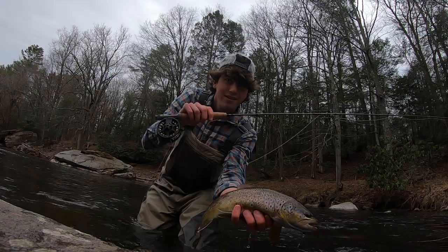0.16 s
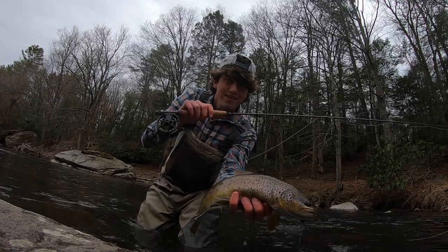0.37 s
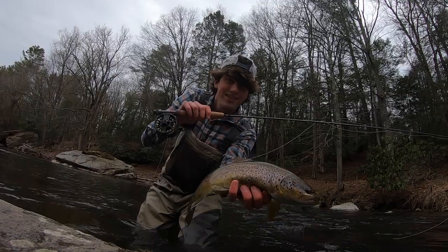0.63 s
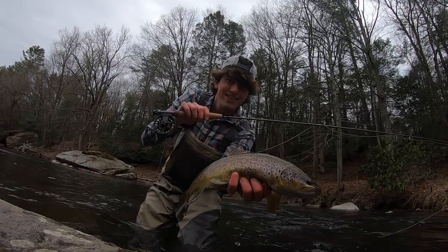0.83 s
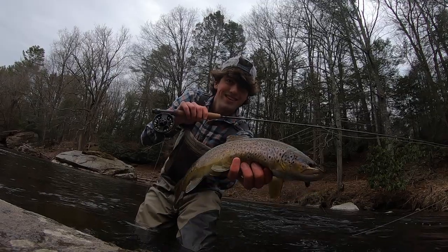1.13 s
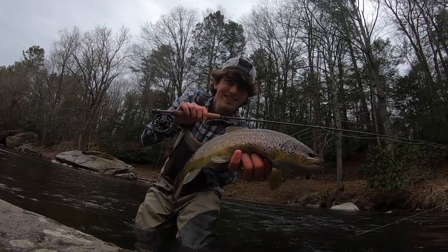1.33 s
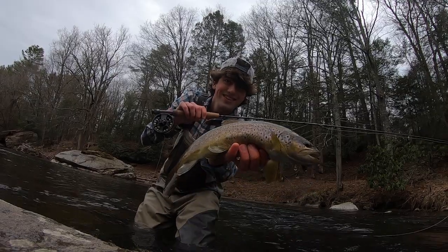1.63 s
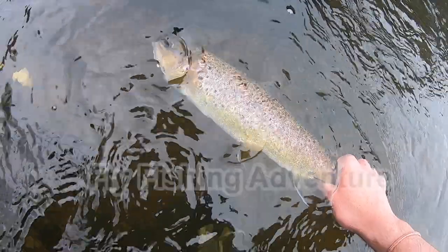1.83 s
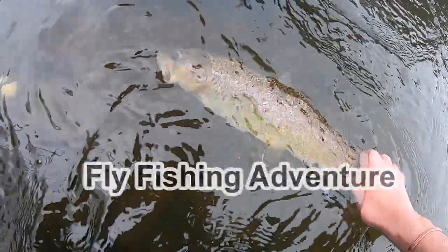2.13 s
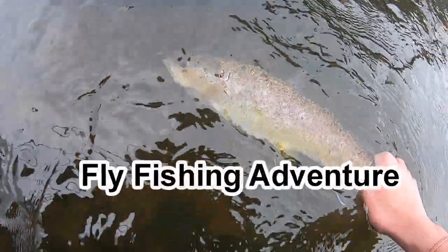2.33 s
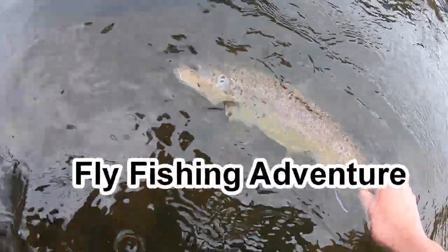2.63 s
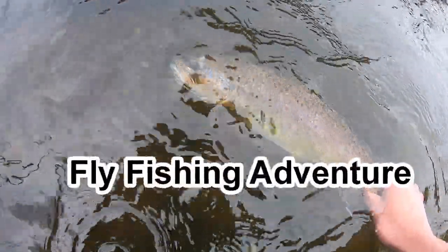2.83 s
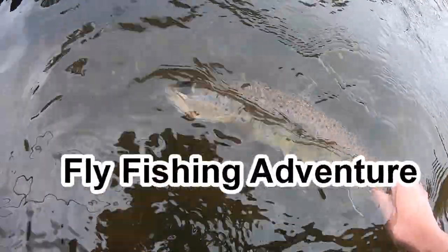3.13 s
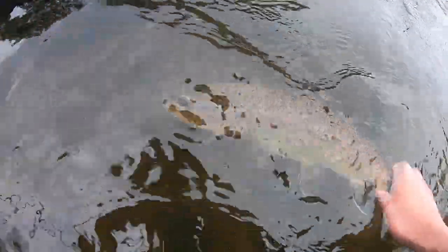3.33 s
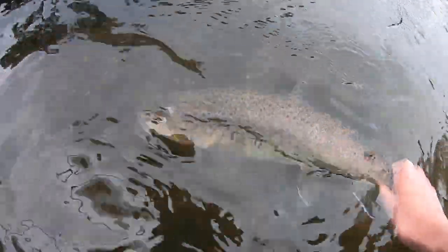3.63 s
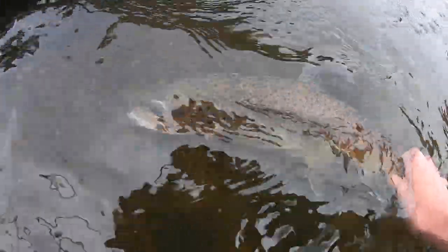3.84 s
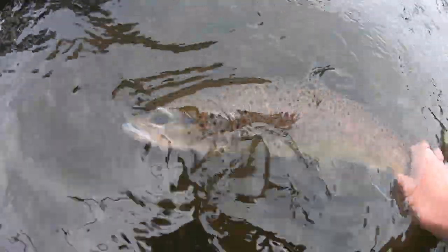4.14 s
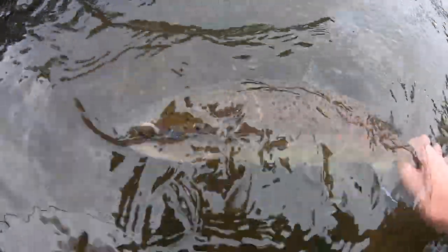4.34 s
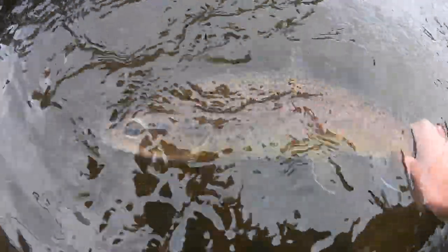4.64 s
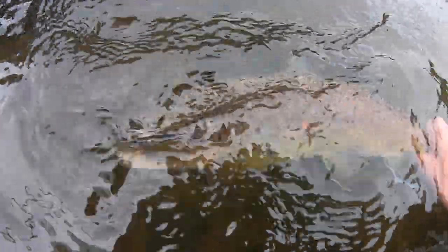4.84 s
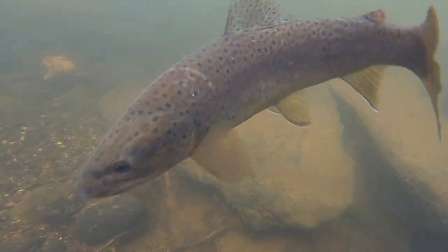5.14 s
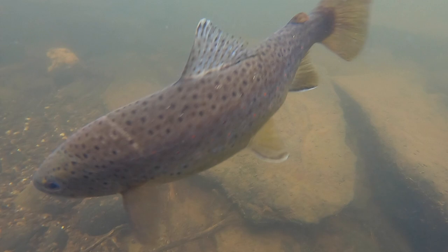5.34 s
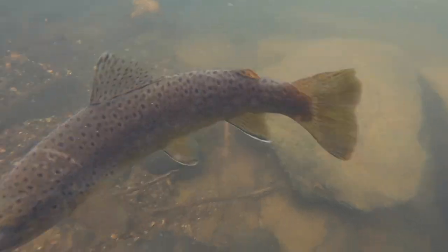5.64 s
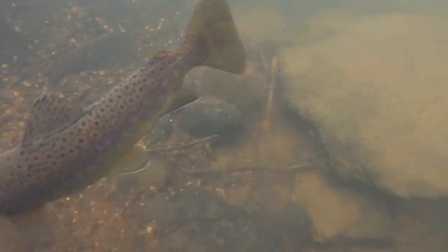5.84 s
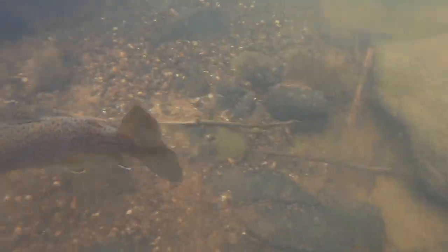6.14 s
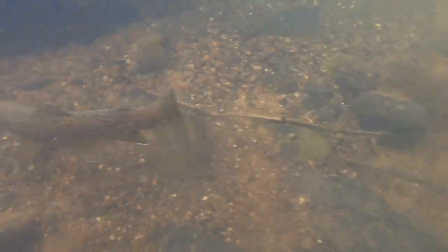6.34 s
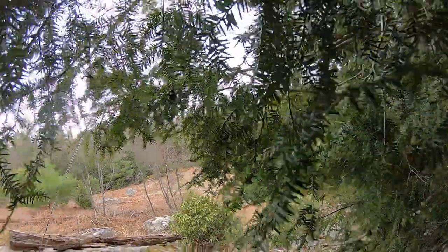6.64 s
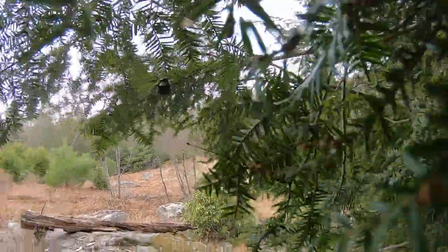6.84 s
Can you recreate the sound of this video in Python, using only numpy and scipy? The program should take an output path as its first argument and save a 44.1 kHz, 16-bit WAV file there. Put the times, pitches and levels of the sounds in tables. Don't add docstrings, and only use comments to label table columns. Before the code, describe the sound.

A stream rushes dully, then close and bright with drips and glugs, plunges into muffled underwater booms and knocks, and ends in quiet leaf rustle.

```python
import sys
import numpy as np
from scipy import signal
from scipy.fft import rfft, irfft, next_fast_len
from scipy.io import wavfile
from scipy.ndimage import uniform_filter1d

SR = 44100
rng = np.random.default_rng(int(sys.argv[2]) if len(sys.argv) > 2 else 0)


def master(y):
    cut = np.clip(np.atleast_2d(y).T, -1, 1)
    pcm = np.round(cut * 32767)
    wavfile.write(sys.argv[1], SR, pcm.astype(np.int16))


def boost_factor(decibels):
    exponent = np.asarray(decibels, float) / 20
    return 10 ** exponent


N = 307818
TIME = np.arange(N) / SR
LEFT_RIGHT = np.array([[.5], [-.5]])


def in_time(rows):
    s, *columns = np.transpose(rows)
    return [np.interp(TIME, s, c) for c in columns]


def at_hz(points, hz):
    return np.interp(np.log(hz + 1), np.log(np.array(points)[:, 0]), np.array(points)[:, 1])


def rms_one(x):
    return x / np.sqrt(np.mean(x ** 2) + 1e-20)


def drift(rate, size):
    r = np.exp(-80 * np.pi * rate / SR)
    slow = signal.lfilter([1], [1, -2 * r, r * r], rng.standard_normal(size // 40 + 1002))[1000:]
    return np.interp(np.arange(size) / 40, np.arange(len(slow)), rms_one(slow))


def band(x, lo_hz, hi_hz, order=2):
    return signal.sosfilt(signal.butter(order, [lo_hz, hi_hz], "band", fs=SR, output="sos"), x)


def even(x, s):
    size = int(s * SR)
    power = uniform_filter1d(uniform_filter1d(x ** 2, size), size)
    return x / np.sqrt(power + 0.054 * np.mean(x ** 2))


def ring(clicks, hz, t60):
    r, w = boost_factor(-60 / (t60 * SR)), 2 * np.pi * hz / SR
    return signal.lfilter([0, np.sin(w)], [1, -2 * r * np.cos(w), r * r], clicks + 1e-18)


def taps(rows, rise_ms):
    out = np.zeros(N + SR)
    ms = np.arange(int(SR * .15)) * 1000 / SR
    rise = np.sin(np.pi / 2 * np.clip(ms / rise_ms, 0, 1)) ** 2
    for (s, db, hz, fall_ms), phase in zip(rows, rng.random(len(rows))):
        shape = rise * np.exp(-np.clip(ms - rise_ms, 0, None) / fall_ms)
        at = round(s * SR)
        out[at:at + len(ms)] += boost_factor(db) * shape * np.sin(2 * np.pi * (hz * ms / 1000 + phase))
    return out[:N]


def swells(start, length, db, rise_db_per_s, fall_db_per_s, rest_db):
    start, length, db, fall = [np.reshape(v, (-1, 1)) for v in (start, length, db, fall_db_per_s)]
    t = TIME[::32]
    rise_db = rise_db_per_s * np.clip(start - t, 0, None)
    each = db - rise_db - fall * np.clip(t - start - length, 0, None)
    return np.interp(TIME, t, np.maximum(each.max(axis=0), rest_db))


SCENES = [
    .036,
    1.8,
    4.94,
    6.5075,
]


def part(k):
    return slice(*[round(s * SR) for s in (SCENES + [N / SR])[k:k + 2]])


# f/Hz, share
FINE_SHARE = [(8300, 0.35), (9300, 0.94)]


def rush(k, spectrum, alike, patchy_db, lean=((100, 0), (200, 0)), top_db=0 * TIME, top=FINE_SHARE):
    size = part(k).stop - part(k).start
    fast = next_fast_len(size)
    hz = np.arange(fast // 2 + 1) * SR / fast
    share = np.clip(at_hz(alike, hz), -.6, 1)
    mid, side = rfft(rng.standard_normal((2, fast))) * boost_factor(at_hz(spectrum, hz))
    pair = np.sqrt(1 + share) * mid + np.sqrt(1 - share) * side * [[1], [-1]]
    pair = pair * boost_factor(at_hz(lean, hz) * LEFT_RIGHT)
    steps = 2 * np.log2(np.maximum(hz, 30) / 30)
    sound, together, splashes = np.zeros((2, size)), drift(2.2, size), drift(46, size)
    for step in range(19):
        gain_db = patchy_db * (0.17 * together + drift(2.3, size) + 0.069 * step * splashes)
        sound += boost_factor(gain_db) * irfft(pair * np.clip(1 - abs(steps - step), 0, 1), fast)[:, :size]
    treble = irfft(rfft(sound, fast) * at_hz(top, hz), fast)[:, :size]
    sound += (boost_factor(top_db[part(k)]) - 1) * treble
    out = np.zeros((2, N))
    out[:, part(k)] = sound
    plain = np.mean(irfft(pair, fast).mean(axis=0) ** 2)
    return out / np.sqrt(1.464 * plain)


def add_bubble(out, s, db, hz, pan_db, cycles, rise, soft=0.25):
    turns = np.arange(int(5 * cycles / hz * SR)) * hz / SR
    tone = np.sin(2 * np.pi * turns * (1 + rise * turns / cycles))
    tone *= np.exp(-turns / cycles) * (1 - np.exp(-turns / soft)) ** 2
    at = round(s * SR)
    out[:, at:at + len(tone)] += (boost_factor(db + LEFT_RIGHT * pan_db) * tone)[:, :N - at]


def bubbles(k, spectrum, count, db, low_hz, span, cycles, wide_db):
    out, start, end = np.zeros((2, N)), SCENES[k], (SCENES + [N / SR])[k + 1] - .02
    for when, pitch, loud, side, long in rng.random((count, 5)):
        hz = low_hz * span ** pitch
        level_db = db + at_hz(spectrum, hz) + 10 * np.log10(hz) - 3.0 * np.log(max(loud, .09))
        s, pan_db = start + when * (end - start), wide_db * (2 * side - 1)
        add_bubble(out, s, level_db, hz, pan_db, cycles * (0.7 + long), .05)
    return out


# f/Hz, level/dB per Hz
FAR_COLOUR = [(12, -28), (20, -5), (48, -16), (113, -4.5), (153, -5), (364, -3), (660, -6), (1260, -16.5),
              (2170, -26), (2340, -31), (3650, -29.5), (4460, -41), (4920, -47.5), (6630, -56.5),
              (7500, -58), (9750, -86), (16500, -120)]
# f/Hz, share
FAR_ALIKE = [(60, 0.86), (180, 1), (550, -0.028), (1650, 0.11), (3200, -0.15), (4970, -0.18), (7000, -0.76)]
# f/Hz, level/dB
FAR_LEAN = [(100, -2.5), (400, -0.1), (700, 0), (1300, -5), (2400, -7), (4400, -3), (8000, 4)]
# t/s, level/dB
FAR_FLOW = [(.04, -41.5), (.3, -40), (.6, -40), (.95, -38), (1.35, -38.5), (1.8, -40.5)]
# t/s, length/s, level/dB
WAVES = [
    (.6, .02, 1.5),
    (.92, 0.33, 1.3),
    (1.7, .1, 1),
]
# f/Hz, share
SPARKLE_SHARE = [(2000, 0), (2500, 1.5), (4100, 2), (4450, 8), (4720, -0.5), (4800, 0.5), (8000, 3.5)]


def far_riffle():
    flow_db, = in_time(FAR_FLOW)
    sparkle_db = swells(*np.transpose(WAVES), 38, 38, -0.5)
    far = rush(0, FAR_COLOUR, FAR_ALIKE, patchy_db=1.58, lean=FAR_LEAN, top_db=sparkle_db, top=SPARKLE_SHARE)
    far += bubbles(0, FAR_COLOUR, count=300, db=-28.5, low_hz=205.6, span=12.46, cycles=3.94, wide_db=8.0)
    far += bubbles(0, FAR_COLOUR, count=120, db=-25.5, low_hz=2076, span=3.1, cycles=7.9, wide_db=15.5)
    return far * boost_factor(flow_db - 0.5) * np.clip((TIME - SCENES[0]) / 0.0093, 0, 1)


# t/s, peak level/dB, f/Hz, pan/dB
FAR_DRIPS = [(.1166, -43, 1050, 8.5), (.2673, -53, 3150, -8), (0.3516, -47, 1420, -20),
             (0.368, -53, 2680, -13), (.548, -52, 2380, -16), (.565, -48, 1600, -4),
             (.7028, -47.5, 2620, -6), (.735, -67, 6060, -5), (.858, -49.5, 2510, -16),
             (.905, -47, 2180, -4), (0.9688, -53, 3370, -16), (1.4669, -48, 2239, 0),
             (1.4674, -44, 1670, 3), (1.6603, -51, 2800, -12)]
# t/s, peak level/dB, f/Hz, pan/dB
NEAR_DRIPS = [(1.8426, -56, 6100, 0), (1.9021, -59, 6800, 6), (2.141, -52, 4800, 4), (2.2495, -54, 7640, 6),
              (2.5229, -61, 8957, -1), (2.6385, -45, 2080, -6), (2.64, -42, 1030, -4),
              (2.737, -44.5, 2110, 24), (2.7376, -53, 7400, -3), (2.7533, -53.5, 7300, -3),
              (2.7539, -59, 9991, 6), (2.838, -49, 6160, -3), (2.889, -45.5, 3080, 12),
              (2.9681, -55, 8050, 15), (2.9857, -51, 6230, -2), (2.995, -44, 3140, 10),
              (3.0023, -59, 10200, -1), (3.0766, -50, 6373, -8), (3.182, -47.5, 7000, 0),
              (3.2511, -54, 8200, 4), (3.387, -41, 1750, 2), (3.5274, -54, 7235, 0),
              (3.6763, -58, 5512, -5), (4.189, -45, 3340, 1), (4.209, -49, 6201, -6),
              (4.22, -38.5, 2300, 4), (4.3963, -52, 7600, 4), (4.577, -48.5, 6340, -6),
              (4.843, -43.5, 6850, 0), (4.849, -50, 4570, 0)]


def drips():
    out = np.zeros((2, N))
    for s, db, hz, pan_db in FAR_DRIPS + NEAR_DRIPS:
        add_bubble(out, s, db + 6.0, hz, pan_db, 4.2 * (hz / 1000) ** 0.31, .012)
    return out


# t/s, peak level/dB, low
# f/Hz, high f/Hz, pan/dB
SNAPS = [(0.37, -38.5, 2490, 3860, -14), (.737, -56, 4800, 6700, 12), (.94, -54, 3400, 5200, -6),
         (1.266, -54, 4100, 4900, -7), (2.6405, -29.5, 900, 3440, -5), (5.155, -69, 1500, 8070, -2.5),
         (5.166, -66, 1500, 8000, -2.5), (5.176, -65, 1500, 8000, -3), (5.345, -56, 1800, 4850, -2),
         (5.366, -66.5, 1800, 5000, 0.5), (5.412, -60, 1800, 5000, -1), (5.377, -69.5, 1800, 5000, -5),
         (5.74, -66, 1800, 6000, 4), (5.771, -65, 1900, 8000, 2.5), (6.285, -65.5, 2100, 6980, 0),
         (6.312, -65, 1700, 4000, 0)]


def sharp_snaps():
    out = np.zeros((2, N))
    for s, db, low_hz, high_hz, pan_db in SNAPS:
        pop = band(signal.unit_impulse(400), low_hz, high_hz, order=4)
        at = round(s * SR)
        out[:, at:at + 400] += boost_factor(db + LEFT_RIGHT * pan_db) * pop / pop.max()
    return out


# t/s, peak level/dB, f/Hz, pan/dB, cycles rung
GLUGS = [
    (0.452, -38, 3560, -17, 9.4),
    (1.884, -35, 1383, -1, 24),
    (2.06, -25.5, 461, -0.5, 9.2),
    (4.854, -27, 1070, 9.4, 4.4),
]


def glugs():
    out = np.zeros((2, N))
    for s, db, hz, pan_db, cycles in GLUGS:
        add_bubble(out, s, db, hz, pan_db, cycles, 12.0 / hz, soft=0.28 * cycles)
    return out


# f/Hz, level/dB per Hz
NEAR_COLOUR = [(12, -54), (20, -2), (54, -6), (101, -13.5), (122, -19), (148, -6), (174, -1.5), (249, -3),
               (468, -3.5), (687, -6.5), (1290, -7), (3020, -20), (5100, -30.5), (5500, -29.5),
               (7250, -26.5), (11000, -49), (13900, -61.5), (14400, -90)]
# f/Hz, share
NEAR_ALIKE = [(60, 0.56), (170, 1), (380, 0.97), (900, 0.65), (2400, 0.38), (5000, 0.67), (7500, -0.37),
              (15000, 0.38)]
# f/Hz, level/dB
NEAR_LEAN = [(100, -2), (400, -1.5), (800, -2.5), (1300, 0.2), (2400, 0.7), (5000, .1)]
# t/s, level/dB
NEAR_FLOW = [(1.8, -41.5), (2.3, -42.5), (2.65, -41.5), (3.0, -41), (3.8, -41.5), (4.2, -40), (4.94, -40.5)]
# t/s, length/s, level/dB
SPRAY = [
    (2.4, 2.6, -1.5),
]
# f/Hz, share
SPRAY_SHARE = [(5150, 0.1), (5350, 1), (9000, 0.91), (11500, 0.087)]


def near_water():
    flow_db, = in_time(NEAR_FLOW)
    spray_db = swells(*np.transpose(SPRAY), 17, 0, -10)
    near = rush(1, NEAR_COLOUR, NEAR_ALIKE, patchy_db=1.12, lean=NEAR_LEAN, top_db=spray_db, top=SPRAY_SHARE)
    near += bubbles(1, NEAR_COLOUR, count=700, db=-30, low_hz=403.2, span=9, cycles=7, wide_db=-7.5)
    pops = bubbles(1, NEAR_COLOUR, count=500, db=-23.0, low_hz=2288, span=8.73, cycles=5.5, wide_db=11.5)
    near += boost_factor(spray_db) * pops
    return near * boost_factor(flow_db) * np.clip((SCENES[2] + 0.01 - TIME) / 0.0058, 0, 1)


# t/s, f/Hz
REACH = [(2.9, 14100), (3.4, 13000), (3.9, 13400), (4.9, 14400)]


def ceiling(x):
    edge_hz = (in_time(REACH)[0] + 450 * drift(10, N))[part(1)]
    out, size = x.copy(), len(edge_hz)
    fast = next_fast_len(size)
    tones, hz = rfft(x[:, part(1)], fast), np.arange(fast // 2 + 1) * SR / fast
    for low_hz in np.arange(12400, 16400, 400):
        shut = np.clip((low_hz - edge_hz) / 100 + 2, 0, 1)
        out[:, part(1)] -= shut * irfft(tones * (abs(hz - low_hz - 200) < 200), fast)[:, :size]
    return out


# t/s, peak level/dB, f/Hz
BUMPS = [
    (2.127, -32.5, 60.6),
    (2.15, -21, 64.5),
    (2.241, -38.5, 65.6),
    (2.545, -37, 96),
    (2.567, -32, 65.8),
    (2.602, -35.5, 64),
    (2.818, -39.5, 67),
    (4.08, -39.5, 48.7),
]


def hand_bumps():
    out = np.zeros((2, N))
    for s, db, hz in BUMPS:
        add_bubble(out, s, db + 5.5, hz, 0, .9, .03)
        add_bubble(out, s - .004, db - 4.5, 2.7 * hz, 0, 1.3, -.04)
    return out


# t/s, length/s, level/dB, buffeting f/Hz
SURGES = [(4.934, 0.038, -15, 17), (5.041, 0.07, -18, 24), (5.184, 0.016, -14, 24), (5.31, 0.058, -13, 16),
          (5.408, 0.0063, -19, 22), (5.611, 0.0083, -22.5, 20), (5.751, 0.035, -15.5, 19),
          (5.917, 0.098, -15.5, 31), (6.091, 0.11, -20.5, 29), (6.319, 0.033, -14, 21),
          (6.475, .02, -15.5, 19)]


def buffeting():
    s, length, db, hz = np.transpose(SURGES)
    turns = np.cumsum(np.interp(TIME, s + length / 2, hz)) / SR
    level_db = swells(s, length, db, 169, 169, -42)
    eddies = even(band(rng.standard_normal(N), 8, 38, order=4), .06)
    return boost_factor(level_db) * (0.87 * np.sin(2 * np.pi * turns) + 0.52 * eddies)


# t/s, level/dB
GURGLE = [(4.93, -47.5), (5.2, -49), (5.38, -48), (5.52, -52), (5.6, -45.5), (5.76, -49.5), (6.05, -51.5),
          (6.18, -43), (6.5, -48)]


def gurgling():
    level_db, = in_time(GURGLE)
    noise = rms_one(band(rng.standard_normal(N), 90, 330, order=4))
    return boost_factor(level_db - 0.5 + 3.7 * drift(35, N)) * noise


# f/Hz, level/dB, t60/s
HOUSING = [(340, -2, .03), (440, -1, .045), (580, -2, .04), (710, -2, .05), (960, -6, .04),
           (1250, -5, .025), (1550, -1, .035), (1750, -5, .025)]
# t/s, length/s, level/dB, rasp against scrape/dB
DRAGS = [
    (5.007, 0.043, -50.5, -24.5),
    (5.161, 0.023, -63, -9.5),
    (5.371, 0.058, -47, -15.5),
    (5.482, 0.026, -59.5, -13.5),
    (5.572, 0.067, -48.5, -12),
    (5.666, .015, -49, -24.5),
    (5.752, 0.07, -61.5, -10),
    (6.153, .06, -66.5, -17.5),
    (6.277, 0.051, -59.5, -15),
    (6.356, 0.067, -59, -15),
]


def scraping():
    s, length, db, bright_db = np.transpose(DRAGS)
    scrape_db = swells(s, length, db, 447, 447, -65)
    rasp_db = swells(s, length, db + bright_db, 447, 447, -82.5)
    grit = (rng.random(N) < 900 / SR) * np.sign(rng.standard_normal(N))
    grit = grit * boost_factor(3 * np.minimum(rng.exponential(1, N), 3))
    low, high = [rms_one(sum(ring(grit, hz, t60 * .6) * (-.68) ** k for k, (hz, db, t60) in enumerate(modes)))
                 for modes in (HOUSING[:5], HOUSING[5:])]
    scrape = boost_factor(scrape_db) * band(low, 330, 1700, order=3) + boost_factor(rasp_db) * band(high, 1350, 2500)
    edge = boost_factor(rasp_db - 19.0) * rms_one(band(grit, 1850, 2100, order=3))
    return scrape, edge


# t/s, level/dB, f/Hz, dying time/ms
TAP_RINGS = [(5.012, -57, 973, 26), (5.024, -27.5, 413, 4.4), (5.03, -37, 696, 6.5), (5.045, -60, 900, 7.1),
             (5.205, -60, 697, 2.6), (5.384, -27, 424, 5.3), (5.387, -50, 804, 2.7), (5.401, -45, 883, 15),
             (5.419, -32, 420, 6.5), (5.425, -33, 838, 3), (5.468, -61, 872, 6), (5.488, -70, 904, 5),
             (5.571, -58, 764, 5), (5.571, -42, 353, 9.2), (5.598, -41, 557, 4), (5.617, -47, 592, 5.4),
             (5.63, -53, 876, 6), (5.635, -44.5, 370, 6), (5.644, -55.5, 885, 6), (5.652, -46, 630, 10),
             (5.678, -50.5, 903, 12), (5.679, -38, 423, 9.7), (5.78, -43.5, 448, 10), (5.845, -49, 450, 3.3),
             (5.842, -55.5, 930, 2.8), (6.029, -55, 792, 3), (6.16, -34, 412, 2), (6.161, -50.5, 754, 3),
             (6.197, -38, 395, 2.8), (6.199, -52, 810, 3.3), (6.274, -36.5, 707, 3.7), (6.275, -44, 458, 7.4),
             (6.31, -58, 794, 4.6), (6.356, -49, 646, 2.5), (6.376, -52.5, 795, 3), (6.379, -35.5, 430, 4.9),
             (6.388, -44, 895, 4.2), (6.39, -29.5, 610, 5.8), (6.412, -35.5, 394, 4.4),
             (6.431, -37, 420, 4.7), (6.431, -53, 756, 3.2),
             (5.026, -37.5, 1060, 1.9), (5.026, -60, 1590, 2), (5.165, -66, 1450, 3.3),
          (5.343, -64, 1340, 3.2), (5.364, -54.5, 1100, 4.9), (5.386, -43.5, 1205, 3.2),
          (5.386, -45, 1550, 2.6), (5.403, -66, 1668, 3.3), (5.425, -49, 1630, 3), (5.471, -74, 1660, 9.9),
          (5.573, -62.5, 1420, 7), (5.586, -63.5, 1680, 4), (5.606, -60, 1480, 4), (5.622, -59, 1640, 4),
          (5.644, -65, 1500, 4), (5.654, -67, 1668, 4.5), (5.683, -61, 1410, 3.3), (5.717, -70.5, 1356, 5),
          (5.806, -62, 1710, 2.7), (5.805, -62, 1356, 3), (5.843, -58.5, 1442, 1.4),
          (5.921, -76, 1460, 6.3), (6.028, -63.5, 1470, 1.9), (6.052, -74, 1480, 6),
          (6.162, -55.5, 1406, 3.4), (6.198, -59.5, 1475, 3), (6.203, -69, 1700, 6),
          (6.215, -68.5, 1604, 3.1), (6.236, -71, 1550, 5.3), (6.274, -52, 1470, 1.6), (6.31, -70, 1664, 2),
          (6.343, -66, 1658, 4), (6.355, -53, 1205, 2.7), (6.356, -60.5, 1540, 1.8), (6.376, -52, 1184, 3),
          (6.376, -55.5, 1518, 3.2), (6.389, -46, 1528, 1.8), (6.412, -52, 1399, 4), (6.42, -61, 1260, 3.4),
          (6.429, -50.5, 1105, 5.2), (6.43, -56, 1530, 4.9)]


def stone_taps():
    return boost_factor(5.5) * taps(TAP_RINGS, rise_ms=2.5)


# t/s, level/dB
THUDS = [
    (5.031, -22.5),
    (5.3903, -31.5),
    (5.432, -3),
    (5.69, -28),
    (5.812, -22),
]


def thuds():
    s, db = np.transpose(THUDS)
    blows = np.zeros(N)
    blows[(s * SR).astype(int)] = boost_factor(db)
    boom = ring(blows - 0.73 * np.roll(blows, 235), 94, 0.061)
    return boom + 0.37 * ring(np.roll(blows, -270), 245, 0.017)


# t/s, level/dB
FLEXES = [(5.032, -19.5), (5.175, -26), (5.238, -22), (5.354, -23.5), (5.465, -23), (5.58, -27.5),
          (5.701, -23), (5.76, -30), (5.824, -20), (5.999, -33), (6.152, -28), (6.27, -37.5), (6.33, -22.5),
          (6.416, -19)]


def flex_boom():
    s, db = np.transpose(FLEXES)
    level_db = swells(s, 0, db, 299, 254.5, -37)
    return boost_factor(level_db + 0.5) * even(band(rng.standard_normal(N), 55.2, 112.2, order=4), 0.0097)


# t/s, peak level/dB, middle of the modes struck f/Hz, dullness/dB per octave off it
KNOCKS = [
    (5.424, -2.5, 327, 29.5),
    (5.806, -3, 333, 21.5),
]


def knocks():
    s, peak_db, middle_hz, dull_db = np.transpose(KNOCKS)
    at, scatter_db = (s * SR).astype(int), rng.normal(0, 4.0, (len(s), len(HOUSING)))
    out = np.zeros(N)
    for k, (hz, db, t60) in enumerate(HOUSING):
        off_db = dull_db * abs(np.log2(hz / middle_hz))
        blows = np.zeros(N)
        blows[at] = boost_factor(peak_db + db - 2.0 + scatter_db[:, k] - off_db) * (-1) ** k
        contact = signal.windows.hann(int(1.3 * SR / hz))
        out += ring(np.convolve(blows, 2.15 * contact / contact.sum())[:N], hz, 0.71 * t60)
    return out


def underwater():
    scrape, edge = scraping()
    body = buffeting() + flex_boom() + gurgling() + scrape + knocks() + stone_taps() + thuds()
    leak = boost_factor(-14.0) * band(body, 1800, 3400, order=3) + edge
    body = signal.sosfilt(signal.cheby1(8, 1, 1800, fs=SR, output="sos"), body) + leak
    body += boost_factor(-96.5) * rms_one(band(rng.standard_normal(N), 1100, 2800))
    fizz = rms_one(band(rng.standard_normal(N), 1900, 4900, order=1))
    body += boost_factor(-48) * uniform_filter1d(abs(body) ** 3, 400) * fizz
    end = part(2).stop
    last = np.clip(1 - (end / SR - TIME) / 0.013, 0, 1) ** 2
    body += (0.076 - body[end - 1]) * last
    body *= np.clip((TIME - 4.93) / 0.012, 0, 1) * (np.arange(N) < end)
    return signal.sosfilt(signal.cheby2(10, 60, 11500, fs=SR, output="sos"), body)


# t/s, level/dB
BREEZE = [(6.515, -63.5), (6.65, -56), (6.82, -59), (6.98, -62.5)]
# f/Hz, level/dB per Hz
AIR_COLOUR = [(18, -46), (30, -0.5), (103, 2.5), (223, 4), (395, -4.5), (569, -2), (919, -2.5), (984, -4),
              (1350, -8), (4140, -13.5), (7000, -30), (9100, -35), (14000, -39), (15400, -63)]


def breeze():
    level_db, = in_time(BREEZE)
    return boost_factor(level_db) * rush(3, AIR_COLOUR, [(50, .99), (5000, 1.0)], patchy_db=2.5)


# t/s, level/dB, f/Hz
NEEDLES = [(6.523, -48, 5200), (6.532, -57, 4520), (6.533, -53, 8505), (6.538, -47, 6578),
           (6.549, -47, 7375), (6.554, -46, 11340), (6.554, -47, 6500), (6.564, -52, 7515),
           (6.576, -46, 4400), (6.592, -41, 5135), (6.595, -46, 10400), (6.599, -42, 7500),
           (6.602, -46, 9300), (6.616, -39, 6530), (6.626, -47, 5570), (6.639, -48, 9549),
           (6.639, -40, 7400), (6.663, -55, 4970), (6.664, -45, 3920), (6.671, -48, 7700),
           (6.684, -53, 5781), (6.687, -52, 7030), (6.694, -52, 7300), (6.693, -44, 4420),
           (6.695, -53, 9700), (6.696, -56, 10600), (6.714, -53, 9571), (6.722, -45, 3800),
           (6.757, -49, 10475)]


def needle_flicks():
    return boost_factor(2.0) * taps([(*row, 1.4) for row in NEEDLES], rise_ms=0.66)


# f/Hz, level/dB per Hz
LEAF_COLOUR = [(880, -15), (1500, -2.5), (1920, -7), (2400, -17), (2620, -7), (3600, -10), (4190, 3),
               (5850, -2), (7330, 2), (8820, -7), (11400, 0), (15600, -23.5)]
# t/s, length/s, level/dB, dying away/dB per s, fine rustle/dB
BRUSHES = [
    (6.525, 0.11, -52, 603, 4),
    (6.658, 0.039, -45, 115, -1.5),
    (6.803, 0.0089, -57.5, 1200, 19),
]


def leaves():
    s, length, db, fall_db, bright_db = np.transpose(BRUSHES)
    lifted_db = 18.0 * np.clip((TIME - 6.788) / 0.0082, 0, 1)
    rustle_db = swells(s, length, db, 820, fall_db, -63.5) - lifted_db
    fine_db = swells(s, length, db + bright_db - 7.0, 900, fall_db, -70) - lifted_db
    alike = [(100, .99), (8000, 0.98), (11000, 0.79), (13000, .1), (15000, 0.05)]
    out = rush(3, LEAF_COLOUR, alike, patchy_db=2.5, top_db=fine_db - rustle_db + 5.5)
    out += bubbles(3, LEAF_COLOUR, count=150, db=-33.0, low_hz=3800, span=0.61, cycles=3.3, wide_db=11.0)
    return out * boost_factor(rustle_db - 1.5 + 1.5 * drift(120, N)) * np.clip((TIME - 6.508) / .012, 0, 1)


# t/s, level/dB, low f/Hz, high f/Hz
TICKS = [(6.5538, -45.5, 4000, 13000), (6.579, -38, 1500, 4500), (6.642, -46, 5500, 11000),
         (6.665, -29.5, 2500, 14500), (6.671, -32, 2500, 14000), (6.695, -35, 2500, 12000),
         (6.6952, -37, 2000, 9000), (6.7009, -35, 2000, 12000), (6.716, -39, 6000, 13000),
         (6.759, -46, 8500, 13000), (6.817, -40, 1500, 6500), (6.9107, -56, 11000, 15600),
         (6.9284, -57, 2000, 12000)]


def twig_ticks():
    out = np.zeros(N)
    for s, db, low_hz, high_hz in TICKS:
        at = round(s * SR)
        burst = rms_one(rng.standard_normal(200)) * np.exp(-np.arange(200) / 30.)
        out[at:at + 200] += boost_factor(db) * band(burst, low_hz, high_hz)
    return out * boost_factor(np.array([[.9], [-.9]]))


def scene():
    drops = drips() + sharp_snaps() + glugs() + hand_bumps()
    far = far_riffle() + drops * (TIME < SCENES[1])
    far = signal.sosfilt(signal.cheby2(16, 45, 7450, fs=SR, output="sos"), far)
    near = ceiling(near_water() + drops * (TIME >= SCENES[1]))
    bank = breeze() + needle_flicks() + leaves() + twig_ticks()
    return far + near + underwater() + bank


def band_limit(x):
    return signal.sosfilt(signal.butter(12, 15720, fs=SR, output="sos"), x)


def record(dry):
    hiss = boost_factor(-104) * rng.standard_normal(dry.shape) * (TIME > SCENES[0])
    cut = signal.sosfilt(signal.cheby2(12, 50, 16100, fs=SR, output="sos"), dry)
    return band_limit(cut + hiss)


dry = scene()
out = record(dry)
master(out)
```